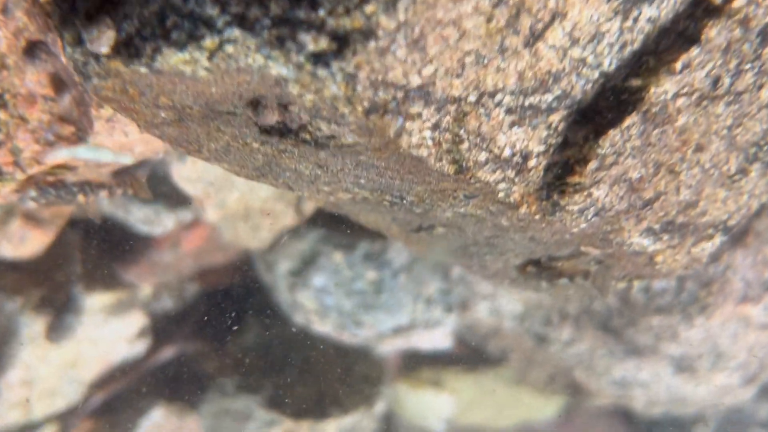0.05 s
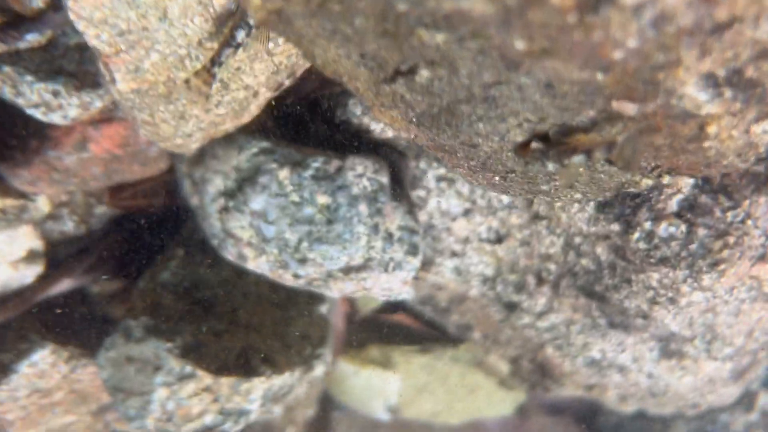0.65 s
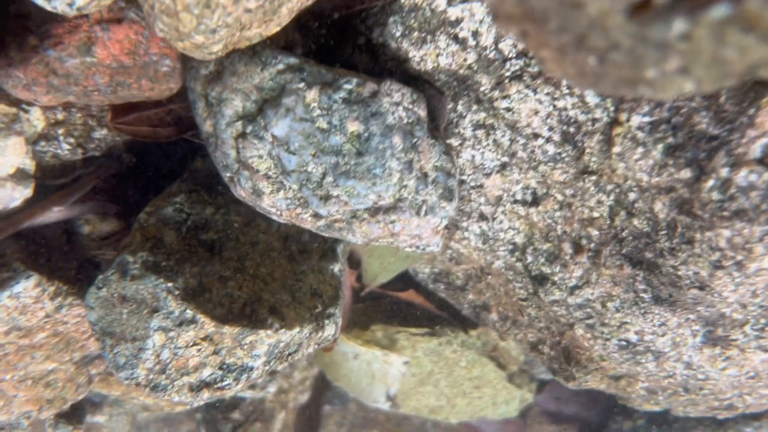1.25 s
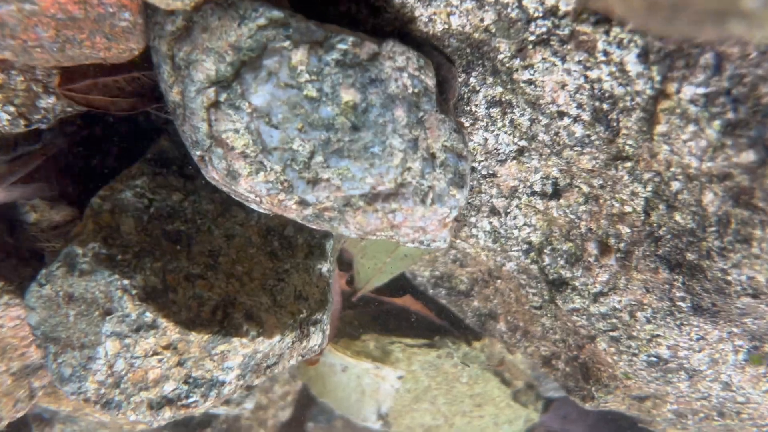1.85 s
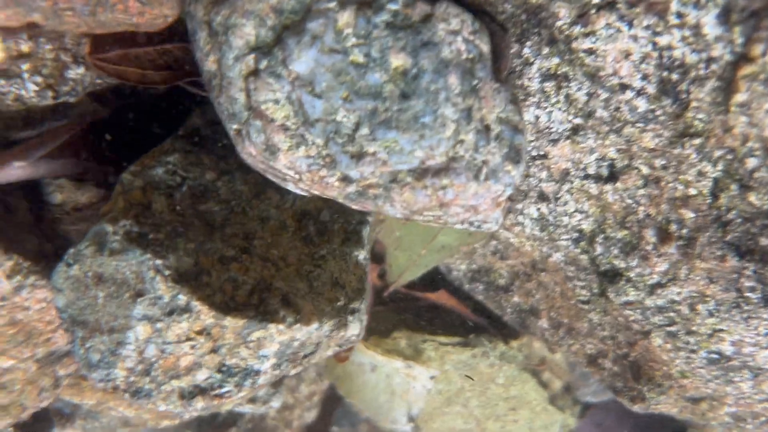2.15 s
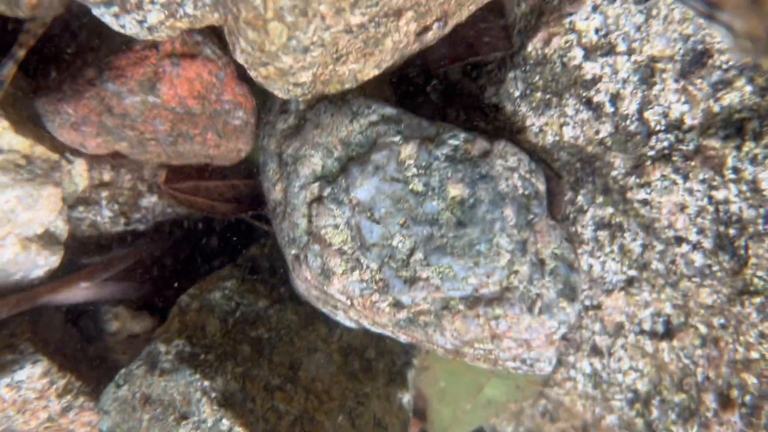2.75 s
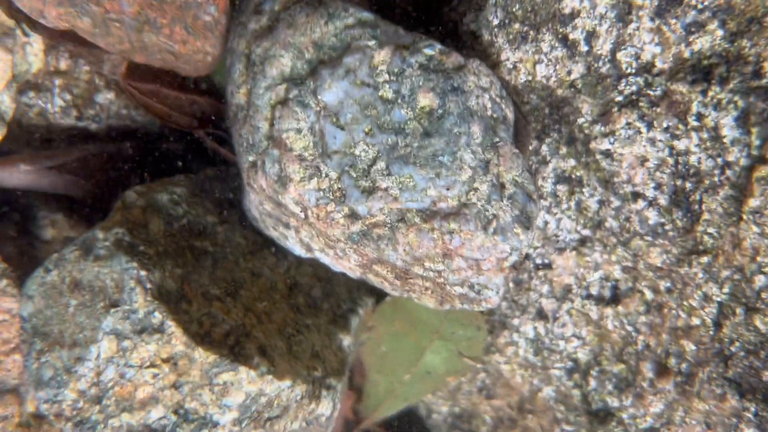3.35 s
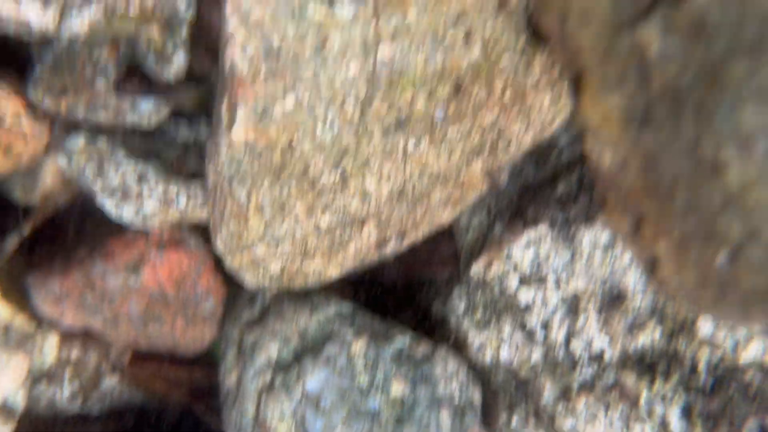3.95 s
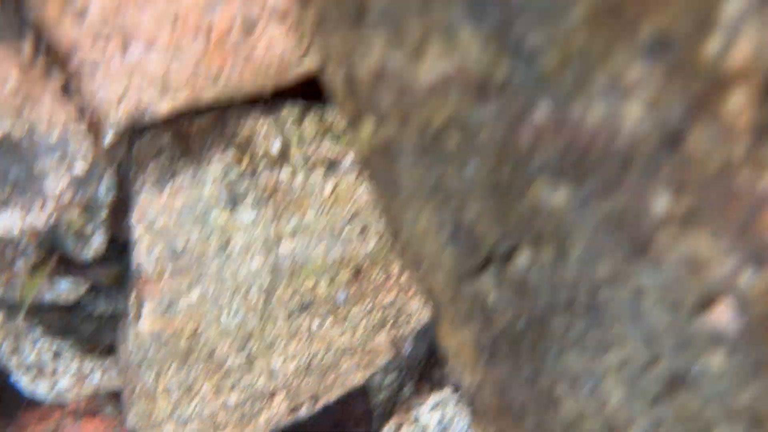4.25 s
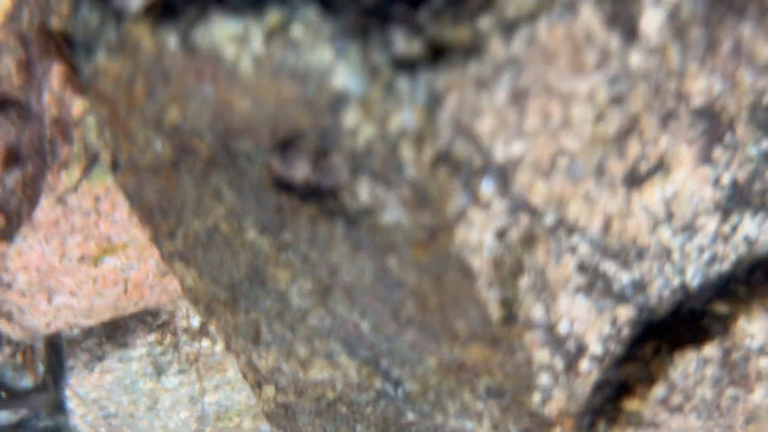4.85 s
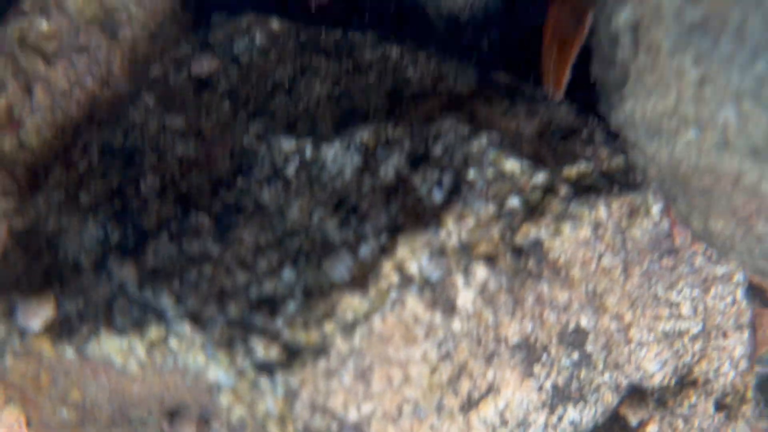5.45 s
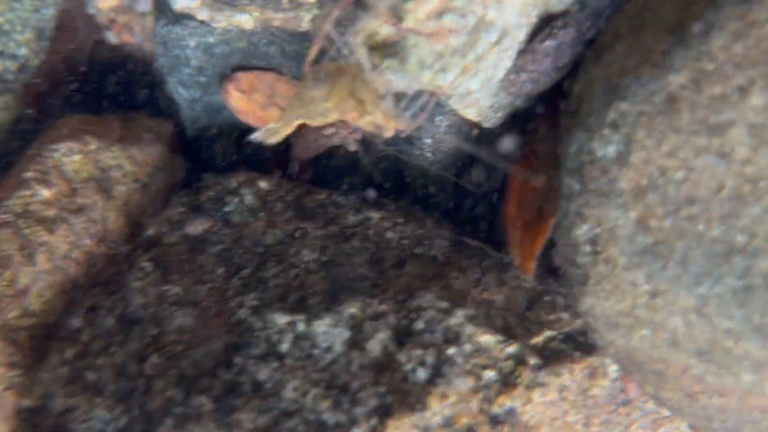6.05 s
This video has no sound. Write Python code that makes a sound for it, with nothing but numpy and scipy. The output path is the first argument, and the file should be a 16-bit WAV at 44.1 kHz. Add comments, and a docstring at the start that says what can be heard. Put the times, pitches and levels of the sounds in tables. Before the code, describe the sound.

Stream water heard from under the surface, its dull churning and low bubbling growing louder as light knocks hit the microphone.

```python
"""Under the surface of a rocky stream, a camera drifts towards a small waterfall.
The plunging water is a bed of rumble and rush, dulled by the water and swelling as the fall nears.
Pockets of air collapse into gulps, quick falling sweeps that the rocks of the pool smear with echoes.
Bursts knock on the housing, grit ticks, and the camera whines faintly. The stereo image comes mostly
from its two microphone ports, which catch the water with different phase and strength."""
import sys
import numpy as np
from scipy import signal
from scipy.fft import rfft, irfft, next_fast_len
from scipy.io import wavfile
from scipy.ndimage import uniform_filter1d

SR = 44100
rng = np.random.default_rng(int(sys.argv[2]) if len(sys.argv) > 2 else 0)


def generate_wav(signal):
    """Clip the signal to [-1, 1] and save it as 16-bit WAV at the path in sys.argv[1]."""
    frames = np.transpose(np.atleast_2d(signal))
    scaled = np.clip(frames, -1, 1) * 32767
    pcm = np.round(scaled).astype(np.int16)
    wavfile.write(sys.argv[1], SR, pcm)


N = 274302
TIME, HZ = np.arange(N) / SR, np.fft.rfftfreq(N, 1 / SR)

# stereo image of the two microphone ports
PORT_PHASE = [(20, -.15), (140, -.5), (270, -.9), (420, -2), (790, -2.9), (910, -1.35), (1150, -.65),
              (1700, 0.5), (2250, 0.85), (3000, -1.5), (3600, 1.27), (4300, -.9)]  # (frequency [Hz], lead of the left port [rad])
PORT_COHERENCE = [(50, 0.92), (160, 0.91), (260, 1), (370, 1), (700, 0.59), (840, 0.12), (1000, 0.78),
                  (1700, 0.83), (2800, 0.49), (3300, 0.14), (8000, 0.18)]  # (frequency [Hz], coherence [0-1])
PORT_BALANCE = [(60, -1), (95, 2.5), (150, -1.5), (230, 1), (370, -6), (580, 0.5), (920, 0), (1440, 0.5),
                (2270, -1), (3580, 1)]  # (frequency [Hz], left minus right [dB])
# the camera's whine
WHINE_TONES = [(3569, -11.5), (3601, -16.5), (3629, -2), (5028, -23)]  # (frequency [Hz], relative level [dB])
WHINE_FADER = [(0, -92), (1.1, -97), (1.4, -88.5), (3.3, -93), (4.8, -77), (6.2, -73.5)]  # (time [s], level [dB])
# ticks of grit or tiny bubbles: (time [s], level [dB], pitch [Hz], decay t60 [s])
GRIT_TICKS = [(0.37, -74, 4800, .008), (0.48, -71, 4200, .008), (1.08, -75, 4700, .008),
              (1.213, -65, 4000, .008), (1.665, -66, 4100, .008), (1.832, -54, 1800, 0.031),
              (1.995, -58, 2760, 0.021), (5.973, -45.5, 1760, 0.058), (6.170, -48.5, 2020, .03)]
# the build as the fall nears, before trims: (time [s], rumble level [dB], rush level [dB])
FLOW_FADERS = [(0.0, -52.5, -59), (0.08, -58, -61), (1.42, -49, -56), (2.08, -47, -54.5),
               (2.46, -46.5, -54.5), (3.46, -43, -49.5), (3.79, -39, -43.5), (4.21, -36.5, -42.5),
               (4.57, -33.5, -41), (4.94, -33, -43), (5.49, -26, -40.5), (5.94, -25.5, -40.5),
               (6.22, -30.5, -39)]
# EQ of the five noise bands in the water bed: (frequency [Hz], relative level [dB])
RUMBLE_EQ = [(15, -41.5), (30, -18), (50, 5.5), (72, 1), (105, -3), (150, -8), (210, -6.5), (320, -17.5),
             (600, -37), (1200, -87.5)]
BOOM_EQ = [(120, -26.5), (200, -3), (250, 4), (280, 1.5), (315, -4.5), (370, -17), (700, -71.5)]
RUSH_EQ = [(150, -18), (350, -10.5), (520, 2.5), (760, 2), (870, 2.5), (1040, 1), (1200, -4.5), (1430, -15),
           (1750, -21.5), (2100, -52.5), (4000, -81.5)]
FIZZ_EQ = [(900, -18.5), (1900, 0.5), (2350, -3.5), (2800, -1), (3200, -11.5), (3800, -12), (5200, -33),
           (6500, -38.5), (9000, -67)]
SPRAY_EQ = [(2500, -25), (4200, 0), (5200, -2), (6500, -18), (8000, -30), (10000, -34)]
# modes of the housing that a knock rings: (frequency [Hz], relative level [dB], decay t60 [s])
HOUSING_MODES = [(804, -8.5, 0.082), (886, 3.5, 0.087), (1012.4, 7.5, 0.055), (1119, 6, 0.048),
                 (1200, -14, 0.12), (1700, -31.5, .03)]
# featured knocks, before trim: (time [s], level [dB], pitch [Hz], left minus right [dB])
LOUD_KNOCKS = [(0.759, -39.5, 1050, 2), (2.25, -41, 1156, 0), (3.543, -32.5, 945, -2.5),
               (4.873, -30, 840, 6.5), (5.441, -26, 952, 1), (5.569, -21.5, 914, 2.5),
               (5.691, -22, 1023, 3), (5.701, -20.5, 997, -2.5), (5.728, -24.5, 993, 3),
               (5.88, -18, 860, 8), (5.892, -19, 998, -4.5), (5.996, -24, 985, -3.5),
               (6.036, -28.5, 997, 7)]
# the housing's colour on a gulp: (frequency [Hz], gain [dB])
GULP_EQ = [(100, -1.5), (205, -1), (255, 5.5), (340, 0.5), (430, 0), (600, 0)]
# close gulps, before trim: (time [s], thud level [dB], sweep centre [Hz], bright edge level [dB])
NEAR_GULPS = [(0.065, -40, 156, -44), (0.278, -39.5, 94, -34.5), (0.482, -35, 135, -41),
              (0.543, -39, 139, -37.5), (0.642, -34, 137, -37), (0.671, -32, 75.4, -44),
              (0.711, -39.5, 192, -41), (0.841, -41, 196, -37), (1.173, -40.5, 197, -34),
              (1.585, -28, 70, -44), (1.946, -32, 103, -34.5), (2.001, -30.5, 76, -35),
              (2.402, -31.5, 140, -37), (2.711, -24.5, 103, -46), (2.946, -31.5, 100, -42.5),
              (3.274, -27, 98, -31), (3.456, -28, 101, -37.5), (4.382, -19, 139, -28.5),
              (4.56, -22, 144, -24.5), (4.999, -15, 99, -31), (5.409, -12.5, 97, -21),
              (5.463, -12, 106, -32.5), (5.633, -12.5, 74, -20), (5.769, -10.5, 65, -27),
              (5.863, -5, 68, -40), (6.078, -8.5, 68, -23.5), (6.095, -11, 99, -37)]


def gain_of(db):
    """Decibels to amplitude."""
    return 10 ** (np.asarray(db) / 20)


def unit_rms(x):
    """Normalises to an rms of one."""
    return x / np.sqrt(np.mean(x ** 2) + 1e-20)


def curve_at(points, hz):
    """Reads a curve on a log-frequency axis."""
    f, value = np.transpose(points)
    return np.interp(np.log(hz + 1), np.log(f + 1), value)


def faders(rows):
    """Gain rides over time, one for each dB column."""
    times, *columns = np.transpose(rows)
    return [gain_of(np.interp(TIME, times, db)) for db in columns]


def follow(fader, share):
    """A gain around 1 that rides a share of a fader's swing in dB."""
    return (fader / np.exp(np.log(fader).mean())) ** share


def add(mix, s, sound):
    """Mixes a sound in at s seconds."""
    start = round(s * SR)
    part = mix[max(start, 0):][:len(sound) + min(start, 0)]
    part += sound[max(-start, 0):][:len(part)]


def jitter(*shape):
    """Random values between -1 and 1."""
    return rng.uniform(-1, 1, shape)


def scattered_cues(fader, count):
    """One random cue in each equal stretch of time, with the fader's level in dB there."""
    times = (np.arange(count) + rng.random(count)) * TIME[-1] / count
    return times, 20 * np.log10(np.interp(times, TIME, fader))


def ports(x):
    """Sound through the wet housing reaches the two ports with different phase and strength."""
    hz = np.fft.rfftfreq(next_fast_len(N + SR), 1 / SR)
    left = np.exp(.5j * curve_at(PORT_PHASE, hz)) * gain_of(curve_at(PORT_BALANCE, hz) / 2)
    return irfft(rfft(x, 2 * len(hz) - 2) * np.array([left, 1 / left]))[:, :N]


def camera_whine():
    """Thin steady tones from inside the camera, far back in the mix."""
    tones = sum(gain_of(db) * np.sin(2 * np.pi * hz * TIME) for hz, db in WHINE_TONES)
    return faders(WHINE_FADER)[0] * np.sqrt(2) * tones


def grit_ticks(attack_s=0.00047):
    """Grit and tiny bubbles: one short, high ping each."""
    out, t = np.zeros(N), TIME[:SR // 8]
    attack = 1 - np.exp(-t / attack_s)
    for s, db, hz, t60 in GRIT_TICKS:
        add(out, s, gain_of(db - 60 * t / t60) * np.sin(2 * np.pi * hz * t) * attack)
    return out


def churn(eq, patchy_db, flicker_db, size):
    """Stereo turbulence: shaped noise broken into brief patches that also flicker together."""
    frames, hz = 4 * N // size + 5, np.fft.rfftfreq(size, 1 / SR)
    draws = rng.standard_normal((5, frames, len(hz))).transpose(0, 2, 1)
    left, unrelated = draws[0] + 1j * draws[1], draws[2] + 1j * draws[3]
    coherence = np.clip(curve_at(PORT_COHERENCE, hz), 0, 1)[:, None]
    right = coherence * left + np.sqrt(1 - coherence ** 2) * unrelated
    patches = unit_rms(uniform_filter1d(uniform_filter1d(draws[4], 5, axis=0), 5, axis=1))
    flicker = unit_rms(uniform_filter1d(rng.standard_normal(frames), 4))
    grains = np.array([left, right]) * gain_of(patchy_db * patches + flicker_db * flicker)
    noise = signal.istft(grains, nperseg=size, noverlap=size - size // 4)[1][:, :N]
    return unit_rms(irfft(rfft(noise) * gain_of(curve_at(eq, HZ)), N))


def plunging_water(rumble, rush, surge_db=3.5, surge_s=.08):
    """The bed: low rumble, the housing's hollow boom, midrange rush, fizz and surging spray on top."""
    low = rumble * gain_of(1.5) * churn(RUMBLE_EQ, patchy_db=1.5, flicker_db=0.5, size=2048)
    boom = follow(rumble, 0.62) * churn(BOOM_EQ, patchy_db=2.23, flicker_db=1.3, size=1024)
    mids = rush * gain_of(5) * churn(RUSH_EQ, patchy_db=1.6, flicker_db=0.94, size=512)
    fizz = follow(rush, 0.87) * churn(FIZZ_EQ, patchy_db=2, flicker_db=-0.06, size=256)
    surges = gain_of(surge_db * np.interp(TIME / surge_s, np.arange(400), jitter(400)))
    spray = follow(rumble, 0.8) * surges * churn(SPRAY_EQ, patchy_db=5, flicker_db=0, size=256)
    return low + gain_of(-46.5) * boom + mids + gain_of(-69) * fizz + gain_of(-89) * spray


def falling_sweep(centre_hz, spread, breadth, cue_hz, size=8192):
    """A dispersed pulse: delay is spread / sqrt(f), so highs land first; cue_hz passes at mid-window."""
    f = np.fft.rfftfreq(size, 1 / SR) + 1e-3
    band = np.exp(-(np.log(f / centre_hz) / breadth) ** 2 / 2)
    low_cut = 1 / np.sqrt(1 + (42 / f) ** 6)
    colour = band * low_cut * gain_of(curve_at(GULP_EQ, f))
    turns = spread * (2 * np.sqrt(f) - f / np.sqrt(cue_hz))
    pulse = np.fft.fftshift(irfft(colour * np.exp(-2j * np.pi * turns)))
    return pulse / abs(signal.hilbert(pulse)).max()


def gurgle(per_s=110, uneven_db=5.5, low_hz=65, high_hz=170, lag_s=0.00064, voices=16):
    """A wash of small gulps from all around, most reaching the right port first."""
    out = np.zeros((2, N))
    for hz in np.geomspace(low_hz, high_hz, voices):
        sizes = gain_of(uneven_db * np.minimum(rng.exponential(1, N), 3))
        triggers = (rng.random(N) < per_s / voices / SR) * rng.choice([-1, 1], N)
        gulp = falling_sweep(hz, spread=rng.uniform(0.1875, 0.3187), breadth=0.77, cue_hz=hz)
        right = signal.oaconvolve(sizes * triggers, gulp, "same")
        left = np.interp(TIME - lag_s * rng.uniform(-1, 2.73), TIME, right)
        out += [left, right]
    return unit_rms(out)


def small_knock_cues(rumble, offset_db=-4, uneven_db=3, hz=1016, detune=0.087, pan_db=6, count=120):
    """Cues for light knocks, left and right, that grow with the rumble."""
    times, rumble_db = scattered_cues(rumble, count)
    size, pitch, side = jitter(count, 3).T
    return list(zip(times, rumble_db + offset_db + uneven_db * size, hz * (1 + detune * pitch),
                    pan_db * side))


def housing_knocks(cues, trim_db=2.2, ring_db=-18, swell_s=0.00087):
    """Bursts hit the housing: a few cycles at their own pitch, then a faint tail from its modes."""
    out, t = np.zeros((2, N)), TIME[:SR // 8]
    envelope = (t / swell_s) ** 2 * np.exp(-t / swell_s)
    ring_attack = 1 - np.exp(-(t / swell_s / 2) ** 2)
    for s, db, pitch, pan_db in cues:
        burst = envelope / envelope.max() * np.sin(2 * np.pi * pitch * t)
        ring = sum(gain_of(mode_db - 60 * t / t60) * np.sin(2 * np.pi * (hz * t + rng.random()))
                   for hz, mode_db, t60 in HOUSING_MODES)
        knock = gain_of(db + trim_db) * (burst + gain_of(ring_db) * ring * ring_attack)
        add(out[0], s, knock * gain_of(pan_db / 2))
        add(out[1], s, knock * gain_of(-pan_db / 2))
    return out


def pool_echoes(x, echo_db=-11, decay_s=0.045, count=10):
    """The rocks of the pool add a few soft reflections that smear each gulp."""
    delays = np.linspace(.012, .07, count) + rng.uniform(-.003, .003, count)
    taps = rng.choice([-1, 1], count) * np.exp(-delays / decay_s)
    taps *= gain_of(echo_db) / np.linalg.norm(taps)
    out = x.copy()
    for s, gain in zip(delays, taps):
        add(out, s, gain * x)
    return out


def far_gulp_cues(rumble, offset_db=8, uneven_db=3.5, edge_db=-6.5, low_hz=70, high_hz=200, count=30):
    """Cues for farther gulps of mixed sizes, riding above the rumble."""
    times, rumble_db = scattered_cues(rumble, count)
    thud_db = rumble_db + offset_db + uneven_db * jitter(count)
    hz = low_hz * (high_hz / low_hz) ** rng.random(count)
    return list(zip(times, thud_db, hz, thud_db + edge_db))


def air_gulps(cues, trim_db=-1, spread=0.1956, edge_hz=470):
    """Large pockets of air collapse one by one: a bright edge dives into a thud."""
    out = np.zeros(N)
    for s, thud_db, hz, edge_db in cues:
        thud = gain_of(thud_db + trim_db) * falling_sweep(hz, spread, breadth=0.52, cue_hz=hz)
        edge = gain_of(edge_db + trim_db) * falling_sweep(edge_hz, spread, breadth=0.24, cue_hz=hz)
        add(out, s - len(thud) / 2 / SR, thud + edge)
    return out


def scene():
    """The mix: bed, gulps, knocks and grit through the ports, with gurgle and whine laid alongside."""
    rumble, rush = faders(FLOW_FADERS)
    bed = plunging_water(rumble, rush)
    gulps = pool_echoes(air_gulps(NEAR_GULPS + far_gulp_cues(rumble)))
    knocks = housing_knocks(LOUD_KNOCKS + small_knock_cues(rumble))
    wash = rumble * gain_of(-1.5) * gurgle()
    return ports(bed + gulps + knocks + grit_ticks()) + wash + camera_whine()


def record(dry, sizzle_hz=9600, sizzle_db=-65, high_cut_hz=10000):
    """Master chain: a trace of ring-modulated sizzle, quick fades at both ends, then a steep high cut."""
    sizzling = dry * (1 + gain_of(sizzle_db) * np.sin(2 * np.pi * sizzle_hz * TIME))
    faded = sizzling * signal.windows.tukey(N, .002)
    high_cut = signal.firwin(511, high_cut_hz, window=("kaiser", 9), fs=SR)
    return signal.oaconvolve(faded, high_cut[None], "same")


dry = scene()
out = record(dry)
generate_wav(out)
```